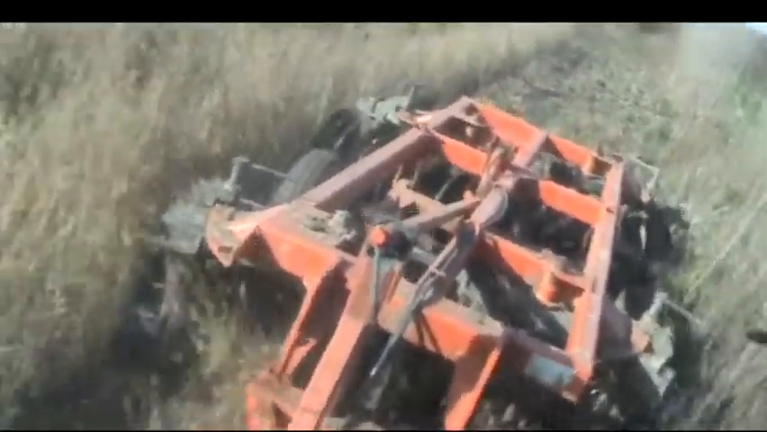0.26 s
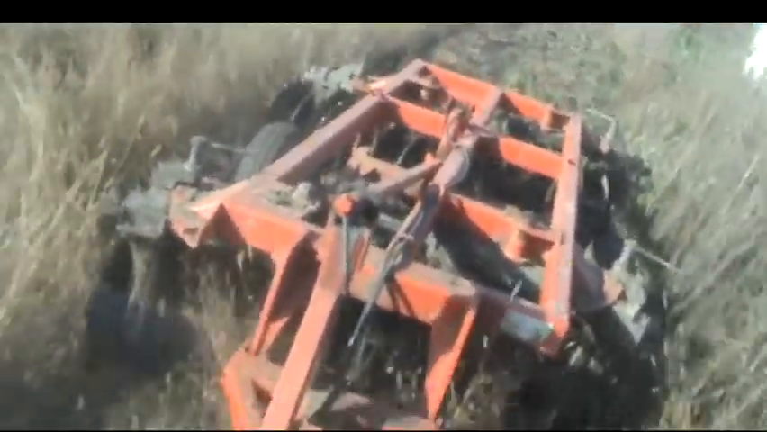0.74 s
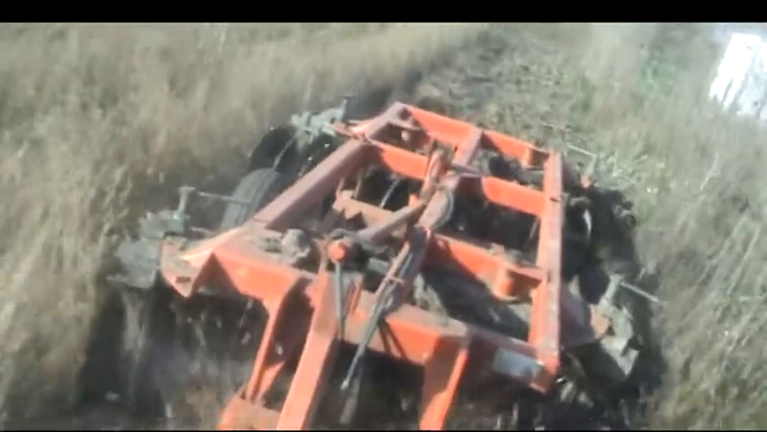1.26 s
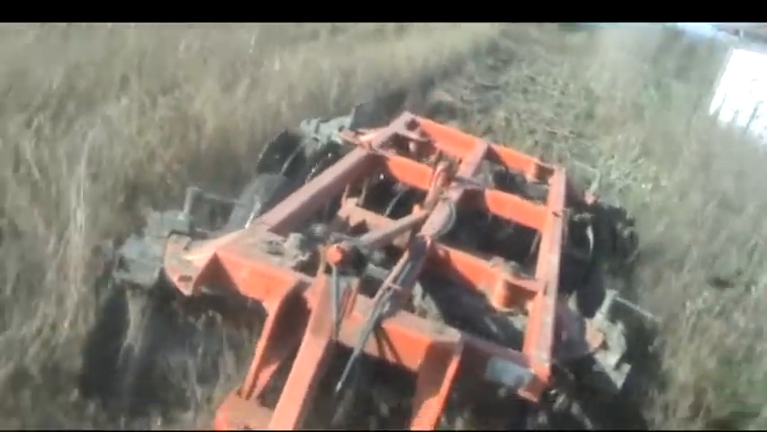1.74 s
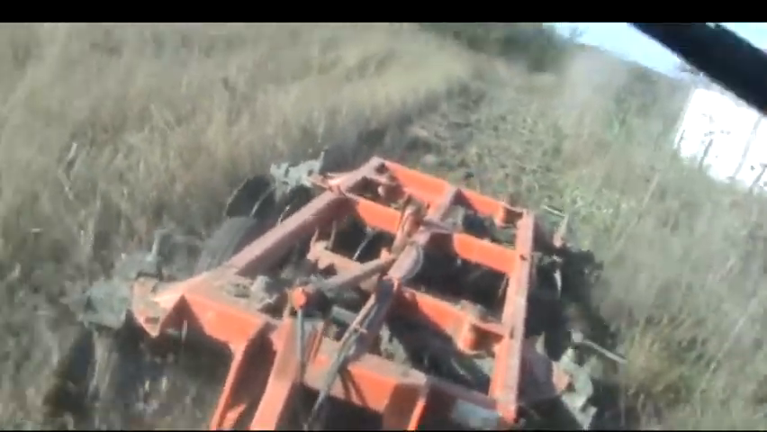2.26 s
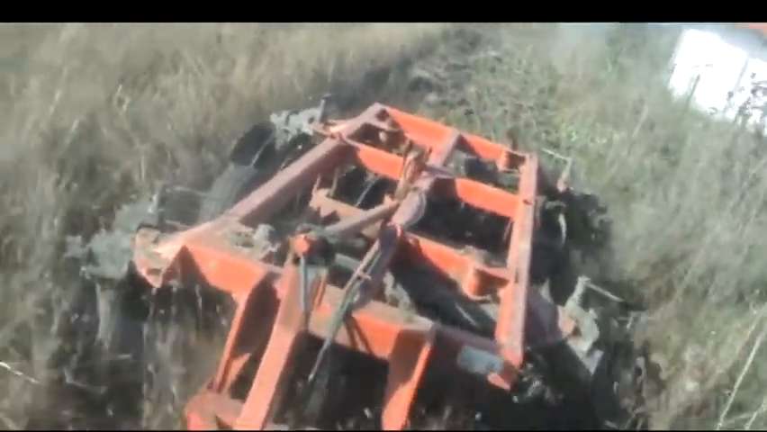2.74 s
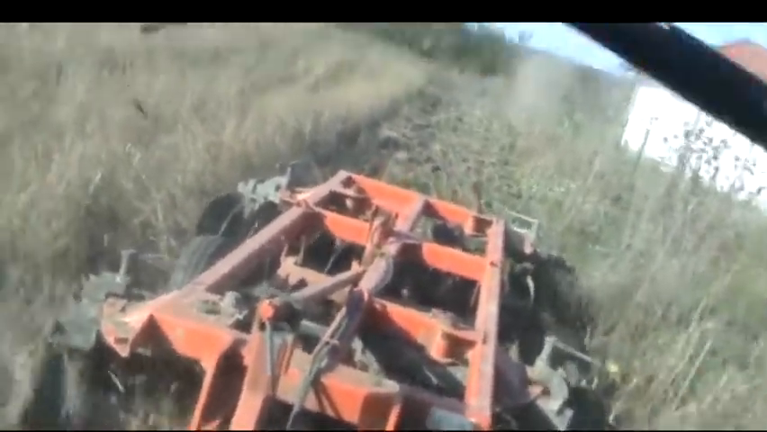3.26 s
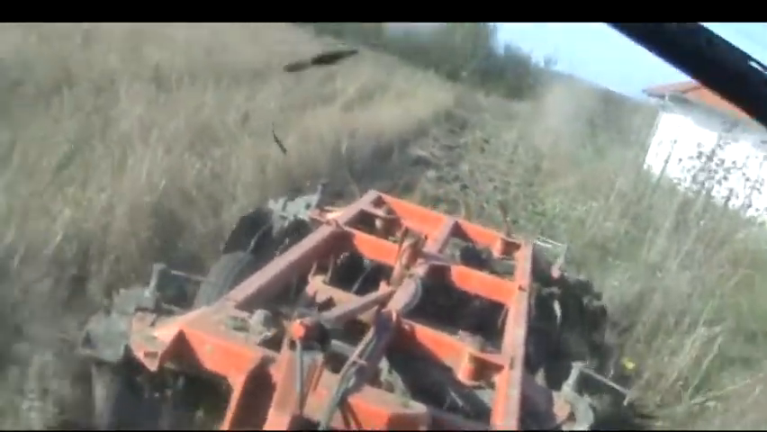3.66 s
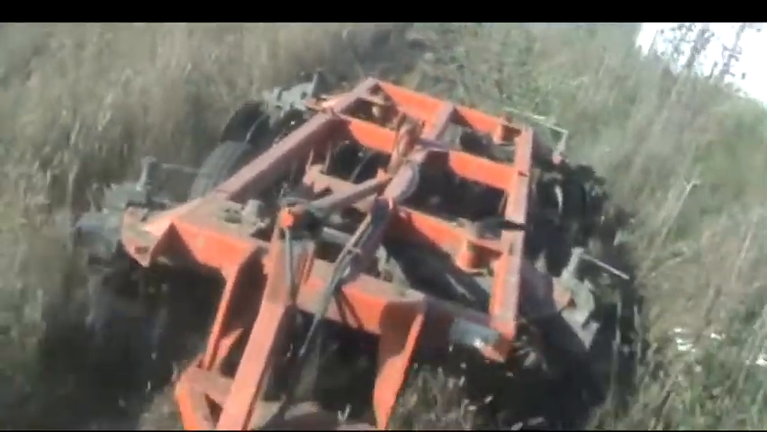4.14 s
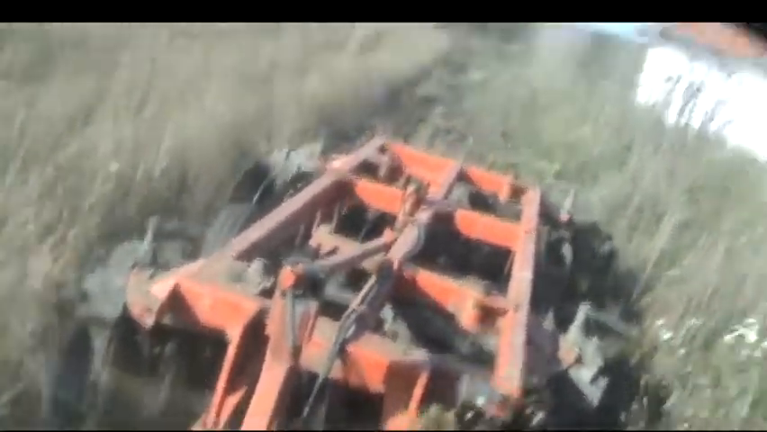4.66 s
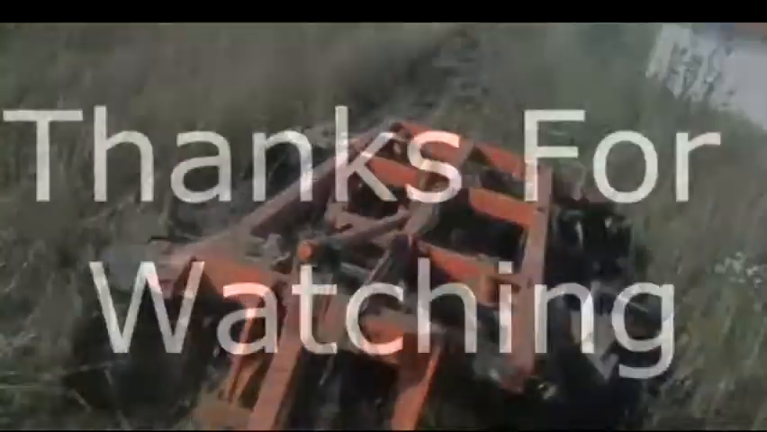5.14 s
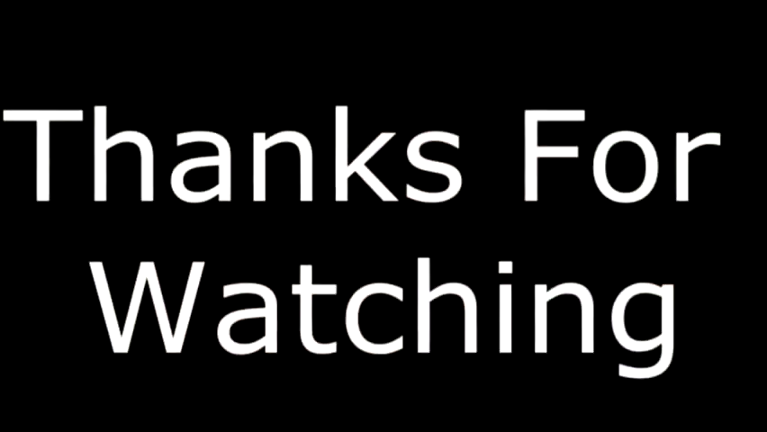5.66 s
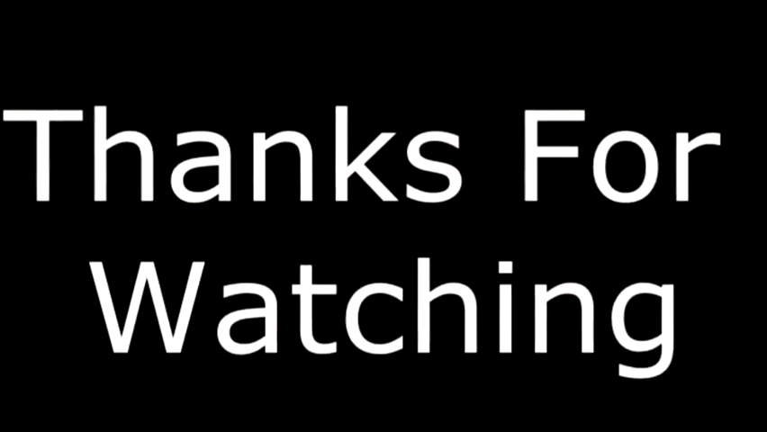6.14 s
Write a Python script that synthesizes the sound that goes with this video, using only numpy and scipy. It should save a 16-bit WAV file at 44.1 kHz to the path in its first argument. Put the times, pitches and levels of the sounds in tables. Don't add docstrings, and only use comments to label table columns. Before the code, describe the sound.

From the driver's seat, a hard-working diesel engine hums and whines while dragging a disc harrow through rustling tall grass, finally fading out.

```python
import sys
import numpy as np
from scipy import signal
from scipy.fft import rfft, irfft, next_fast_len
from scipy.io import wavfile
from scipy.ndimage import uniform_filter1d

SR = 44100
rng = np.random.default_rng(int(sys.argv[2]) if len(sys.argv) > 2 else 0)


def to_wav(s):
    ch = np.atleast_2d(s).T
    pcm = np.round(np.clip(ch, -1, 1) * 32767)
    wavfile.write(sys.argv[1], SR, pcm.astype(np.int16))


def amplitude_ratio(level_db):
    exponent = np.asarray(level_db, float) / 20
    return 10 ** exponent


N = 281783
T = np.arange(N) / SR
SLOW_T = T[::256]
MEAN_SPEED = 67.7

# centre in seconds, half length in seconds, change in dB.
LUGS = [
    (.3, 0.19, 2),
    (.9, 0.23, -5),
    (1.5, .15, -2),
    (1.95, 0.23, 0),
    (2.7, 0.43, 1.5),
    (3.2, 0.15, 3),
    (3.85, .25, -1),
    (4.62, 0.32, 2.5),
    (5.3, 0.36, 2),
]


def evened(x):
    return x / np.sqrt(np.mean(x ** 2) + 1e-20)


def read(points, hz):
    f, value = np.transpose(points)
    return np.interp(np.log(hz + 1), np.log(f + 1), value)


def drift(top_hz):
    total = 0
    for k in np.geomspace(1 / 16, 1, 12):
        total = total + np.sin(2 * np.pi * (top_hz * k * SLOW_T + rng.random())) / np.sqrt(k)
    return evened(total)


def bump(s, half):
    return np.exp(-np.minimum(abs(SLOW_T - s) / half, 4) ** 3)


def swells(rows):
    return np.interp(T, SLOW_T, sum(db * bump(s, half) for s, half, db in rows))


def tone(turns, db, wander_db, wobble, start=None):
    start = 2 * np.pi * rng.random() if start is None else start
    phase = 2 * np.pi * turns + np.interp(T, SLOW_T, start + wobble * drift(11))
    level = amplitude_ratio((db + 0 * T)[::256] + wander_db * drift(12))
    return np.sqrt(2) * np.interp(T, SLOW_T, level) * np.cos(phase)


def noise(shape, patchy_db, size):
    hop, hz = size // 4, np.fft.rfftfreq(size, 1 / SR)
    a, b, c, d, patches = rng.standard_normal((N // hop + 5, len(hz), 5)).T
    patches = uniform_filter1d(patches, size=7, axis=0)
    patches = evened(uniform_filter1d(patches, size=12, axis=1))
    inside = (hz > shape[0][0]) & (hz < shape[-1][0])
    colour_db = read(shape, hz) - 90 * ~inside
    z = np.array([a + 1j * b, c + 1j * d]) * amplitude_ratio(colour_db[:, None] + patchy_db * patches)
    return evened(signal.istft(z, nperseg=size, noverlap=size - hop)[1][:, :N])


def speed():
    # time in seconds, firings per second.
    speeds = [(0.0, 66.9), (0.6, 68.0), (0.8, 67.7), (1.0, 68.4), (1.22, 67.4), (1.6, 68.5), (1.85, 67.7),
              (2.3, 68.2), (2.53, 66.6), (2.78, 68.4), (3.05, 67.3), (3.2, 67.6), (3.5, 66.0), (3.78, 68.3),
              (4.35, 67.7), (4.73, 68.1), (5.05, 67.4), (5.6, 68.0)]
    s, rate = np.transpose(speeds)
    flywheel_s = 0.07
    return uniform_filter1d(np.interp(T, s, rate), size=round(flywheel_s * SR))


def exhaust(firings):
    orders = [1, 2, 2.25, 3]
    # level in dB, dB per dB of effort, dB per firing a second of sag.
    strong = [
        (-28, 0.02, .1),
        (-33, 1.07, 1),
        (-32.5, 1.9, -2),
        (-35.5, 0.64, 4.5),
    ]
    quarters_db = [-42, -51, -54.5, -60, -63.5, -56, -73, -72, -60.5, -46.5, -45, -67, -40.5, -48, -42, -39,
                   -42.5, -45.5, -55.5, -43.5, -63.5, -56.5, -55, -44, -58.5, -70, -58, -48.5, -47, -51.5,
                   -64.5, -51, -65.5, -57, -76, -56.5, -58.5, -68.5, -70.5, -67.5]
    pipe_smear = -1.15
    effort_db, sag = swells(LUGS), MEAN_SPEED - speed()
    pulses = 0
    for k, (db, effort_share, lug_db) in zip(orders, strong):
        level_db = db + effort_share * effort_db + lug_db * sag
        pulses = pulses + tone(k * firings, level_db, 0.54, 0.088, pipe_smear * k ** 2)
    uneven = 0
    for k, db in enumerate(quarters_db):
        if db > -69:
            uneven = uneven + tone((k + 1) / 4 * firings, db, 2.5, 0.5)
    return uneven - pulses


def axle_db():
    # centre in seconds, half length in seconds, pull in dB.
    bites = [(.18, 0.2, -0.5), (.55, 0.18, -5), (1.159, 0.21, -2), (1.904, 0.28, -6.5), (2.62, 0.22, -1.5),
             (3.12, 0.14, 0.5), (3.36, 0.12, 0.5), (3.56, 0.07, -6.5), (3.98, 0.18, -5), (4.344, 0.16, 0),
             (4.648, .11, 1.5), (4.88, 0.11, 3.5), (5.08, 0.072, -9.5), (5.481, 0.29, -2.5)]
    pull = amplitude_ratio(-21)
    for s, half, db in bites:
        pull = pull + amplitude_ratio(db) * bump(s, half)
    return -27.5 + np.interp(T, SLOW_T, 20 * np.log10(pull))


def gearbox_db():
    # centre in seconds, half length in seconds, change in dB.
    grinds = [(.28, 0.067, 3.5), (.55, .12, 4), (.92, 0.065, -3.5), (1.08, .07, 6.5), (1.27, 0.11, 6),
              (1.57, 0.052, 7.5), (1.88, .08, 4.5), (2.22, 0.1, 7.5), (2.82, 0.12, 3.5), (3.3, 0.6, 2),
              (3.95, 0.053, 9.5), (4.25, 0.07, 4.5), (5.1, 0.072, 4), (5.55, 0.18, 5.5)]
    return -39 + swells(grinds)


def pump_db():
    # centre in seconds, half length in seconds, change in dB.
    slips = [
        (.1, 0.28, 13),
        (.6, 0.15, -6),
        (2.2, .3, 2),
        (3.1, 0.032, 5.5),
        (3.5, 0.11, 2.5),
        (3.73, 0.11, -7),
        (4.65, 0.16, -1),
    ]
    on_s, rise_s, idle_db, creep_db_per_s = 1.1, 0.1, -15.5, 1
    idling = idle_db / (1 + np.exp((T - on_s) / rise_s))
    return -43.5 + idling + creep_db_per_s * (T - 3) + swells(slips)


def gears(firings):
    mesh_rates = [6.54, 8.21, 15.0]
    axle_overtones = [-31]
    gearbox_overtones = [-13, -20, -27.5, -22.5]
    pump_overtones = [-33, -32.5]
    timing_overtones = [0, -8, 3.5, -4.5, -1.5, -4, -14.5, -8]
    levels = [axle_db(), gearbox_db(), pump_db()]
    out = sum(tone(mesh * firings, db, 1.2, 0.37) for mesh, db in zip(mesh_rates, levels))
    meshes, levels = list(mesh_rates) + [5.16], levels + [-56]
    overtones = [axle_overtones, gearbox_overtones, pump_overtones, timing_overtones]
    for mesh, db, overs in zip(meshes, levels, overtones):
        for k, over_db in enumerate(overs, start=2):
            out = out + tone(k * mesh * firings, np.mean(db) + over_db, 1.4, 0.7 * k)
    return out


def loose_gears(firings):
    # multiple of firing, level in dB.
    loose = [(11.85, -51.5), (12.88, -53.5), (14.0, -57.5), (15.5, -55), (18.2, -58), (21.98, -61.5),
             (39.1, -63)]
    return sum(tone(multiple * firings, db, 2.8, 1.5) for multiple, db in loose)


def singing_teeth(firings):
    # peak in seconds, length in seconds, multiple of firing, level in dB.
    sings = [
        (.2, .4, 51.7, -60.5),
        (4.851, 1, 41.1, -64),
        (.8, .35, 32.9, -56.5),
        (1.6, .2, 51.7, -61),
        (1.97, 0.59, 46.4, -57.5),
        (2.75, .3, 30.9, -54.5),
    ]
    out = 0
    for s, length, multiple, db in sings:
        out = out + tone(multiple * firings, db - 30 * ((T - s) / length) ** 2, 0.94, 0.6)
    return out


def combustion_knock(firings):
    blow = 3 * firings
    knock = np.exp(-(blow % 1) / 0.75) * amplitude_ratio(1.9 * rng.standard_normal(N)[blow.astype(int)])
    return uniform_filter1d(knock, size=40)


def rumble():
    # frequency in Hz, level in dB.
    rumble_colour = [(12, -21), (28, -18), (55, -17), (78, -15.5), (97, -4), (120, -16.5), (172, 1),
                     (235, -15), (290, -8.5), (360, -13.5), (480, -12.5), (700, -37.5)]
    # centre in seconds, half length in seconds, change in dB.
    thuds = [
        (.05, .06, 1),
        (.8, .2, 4),
        (1.5, .1, 1.5),
        (2.75, .2, 2),
        (3.98, .15, 2.5),
        (4.3, .15, 2.5),
    ]
    level_db = -28 + 0.19 * swells(LUGS) + swells(thuds)
    shake = noise(rumble_colour, 1.0, size=4096)
    swell = uniform_filter1d(shake ** 2, size=900, axis=1) + 0.05
    steady = evened(shake / swell ** (0.87 / 2))
    return amplitude_ratio(level_db + 1.12) * steady


def hum(knock):
    # frequency in Hz, level in dB.
    hum_colour = [(400, -9.5), (540, 1.5), (620, -0.5), (715, -0.5), (765, -13.5), (900, -21.5)]
    # centre in seconds, half length in seconds, change in dB.
    buzzes = [
        (.5, 0.13, 5.5),
        (.85, 0.25, 6.5),
        (1.25, 0.22, 7.5),
        (1.65, .1, 4),
        (2.2, .3, -1),
        (3.9, 0.054, 6.5),
        (4.5, .3, 2.5),
    ]
    level_db = -49 + swells(buzzes)
    return amplitude_ratio(level_db + 7.0) * noise(hum_colour, 1.1, size=1024) * evened(1 + 0.5 * knock)


def clatter(knock):
    # frequency in Hz, level in dB.
    clatter_colour = [(600, -7.5), (700, 6.5), (800, 9.5), (880, 4), (1000, 4.5), (1300, 3.5), (1600, -1.5),
                      (1900, -3), (2200, -2), (2800, -5), (3300, -7.5), (4200, -12.5), (6000, -27)]
    level_db = -44.5 + 0.8 * (speed() - MEAN_SPEED)
    return amplitude_ratio(level_db + 3.0) * noise(clatter_colour, 0.63, size=512) * evened(1 + 1.9 * knock)


def rustle():
    # frequency in Hz, level in dB.
    rustle_colour = [(3000, -11.5), (4500, -4.5), (5200, -6), (6500, -4.5), (8000, -11.5), (10000, -13),
                     (12000, -20.5), (13500, -22.5), (14600, -38), (15850, -27.5)]
    snaps = amplitude_ratio(1.3 * np.minimum(rng.exponential(1, N), 4)) * (rng.random(N) < 70 / SR)
    bursts = signal.oaconvolve(snaps, signal.windows.hann(500) ** 1.5)[:N]
    return amplitude_ratio(-54) * noise(rustle_colour, 1.1, size=256) * evened(1 + 0.2 * bursts)


def whips():
    # peak in seconds, level in dB, centre in Hz, length in seconds, width as share of centre.
    stalks = [(0.263, -48.5, 7500, 0.0052, .2), (0.448, -47.5, 6960, 0.007, .15),
              (0.67, -58, 11500, .012, 0.18), (0.715, -54, 5600, .025, .04), (.795, -63, 8950, .015, .3),
              (.852, -61, 11690, .012, .12), (1.026, -56, 5800, .025, .05),
              (1.045, -49.5, 8500, 0.021, 0.88), (1.11, -59, 8880, .012, .3), (1.663, -53, 7200, .012, .08),
              (2.132, -54.5, 7470, 0.024, .15), (2.34, -56, 8800, .01, .1), (2.76, -57.5, 8950, .01, .2),
              (2.84, -50, 7800, 0.022, 0.18), (3.006, -57.5, 10500, 0.018, 0.34),
              (3.382, -59.5, 7450, .01, .15), (3.889, -53.5, 10500, 0.031, 0.89),
              (4.585, -59.5, 11100, 0.015, 0.25), (4.648, -57.5, 8000, 0.012, 0.11),
              (5.11, -58, 9520, .012, .1)]
    dull = signal.butter(3, 9500, fs=SR, output="sos")
    hiss = signal.sosfilt(dull, rng.standard_normal((2, N)))
    thin = signal.butter(4, 11500, "highpass", fs=SR, output="sos")
    crack = signal.sosfilt(thin, rng.standard_normal(N))
    out = np.zeros((2, N))
    for s, db, hz, length, width in stalks:
        near = slice(round((s - 0.06) * SR), round((s + 0.06) * SR))
        band = signal.butter(3, [hz / (1 + width), hz * (1 + width)], "bandpass", fs=SR, output="sos")
        shape = np.exp(-((T[near] - s) / (length / 2)) ** 2)
        out[:, near] += amplitude_ratio(db) * shape * evened(signal.sosfilt(band, hiss[:, near]))
        out[0, near] += amplitude_ratio(db - 18.5) * min(2 * width, 1) * shape * crack[near]
    return out


def discs():
    # frequency in Hz, level in dB, 60 dB decay in seconds.
    modes = [(2310, -66, 0.17), (3245, -72.5, 0.16), (3476, -66, .12), (3840, -67, .15), (4540, -69.5, .12),
             (5600, -73.5, .12), (6020, -72, 0.13), (6700, -74.5, 0.092), (7350, -72.5, .1),
             (8000, -78.5, .08)]
    out = np.zeros(N)
    for hz, db, t60 in modes:
        r = amplitude_ratio(-60 / (t60 * SR))
        for detune in rng.uniform(0.94, 1.02, 3):
            jolts = np.zeros(N)
            jolts[rng.integers(0, N, size=110)] = amplitude_ratio(1.1 * np.minimum(rng.exponential(1, 110), 2.5))
            turn = 2 * np.pi * hz * detune / SR
            ring = signal.lfilter([1], [1, -2 * r * np.cos(turn), r * r], jolts)
            out += amplitude_ratio(db - 1) * evened(ring)
    return out


def scene():
    firings = np.cumsum(speed()) / SR
    knock = combustion_knock(firings)
    field = rumble() + hum(knock) + clatter(knock) + rustle() + whips()
    field[0] += exhaust(firings) + gears(firings) + loose_gears(firings) + singing_teeth(firings)
    field[0] += discs()
    return field


def right_port(dry):
    # frequency in Hz, left minus right in dB.
    balance_db = [(60, 6), (110, 6), (200, 2), (380, 3), (700, 1.5), (1290, 0.5), (2380, -1.5),
                  (4400, -2.5), (8120, -2.0), (15000, 4)]
    # frequency in Hz, radians by which the left leads.
    lag = [(17, 0), (68, -.9), (200, -1.5), (690, -1.6), (1400, -1.3), (2750, -.6), (5500, 0), (10000, .15),
           (12000, -.15)]
    # frequency in Hz, likeness from -1 to 1 (below zero the right channel opposes the left).
    likeness = [(40, .94), (70, .99), (200, .99), (430, .94), (900, .91), (2000, .8), (6800, .86),
                (9600, .74), (10900, -.1), (12400, -.75), (13600, -.7), (14600, .2), (15300, .9)]
    size = next_fast_len(N + 8192)
    hz = np.fft.rfftfreq(size, 1 / SR)
    direct, other = rfft(dry, size)
    alike = np.clip(read(likeness, hz), -1, 1)
    mixed = alike * direct + np.sqrt(1 - alike ** 2) * other
    mixed = mixed * amplitude_ratio(-read(balance_db, hz)) * np.exp(-1j * read(lag, hz))
    return irfft(mixed, size)[:N]


def roll_off(x):
    return signal.sosfilt(signal.butter(12, 15890, fs=SR, output="sos"), x)


def record(dry):
    dry = dry * np.minimum(T / 0.0011, 1)
    pair = np.array([dry[0], right_port(dry)])
    pair = 0.56 * np.tanh(pair / 0.61)
    fade_from_s, fade_to_s, fade_bend = 4.72, 5.721, 0.83
    left_over = np.clip((fade_to_s - T) / (fade_to_s - fade_from_s), 0, 1)
    return roll_off(pair * np.sin(np.pi / 2 * left_over) ** fade_bend)


dry = scene()
out = record(dry)
to_wav(out)
```